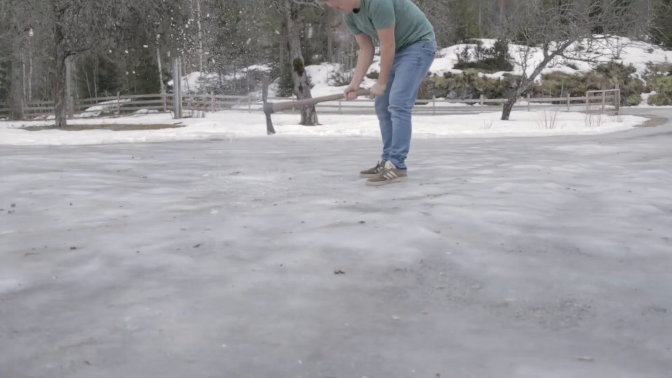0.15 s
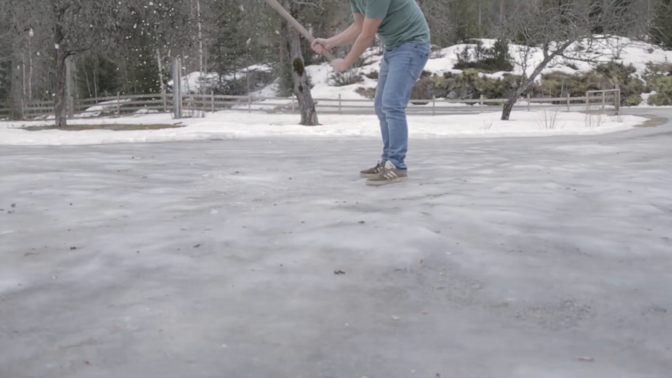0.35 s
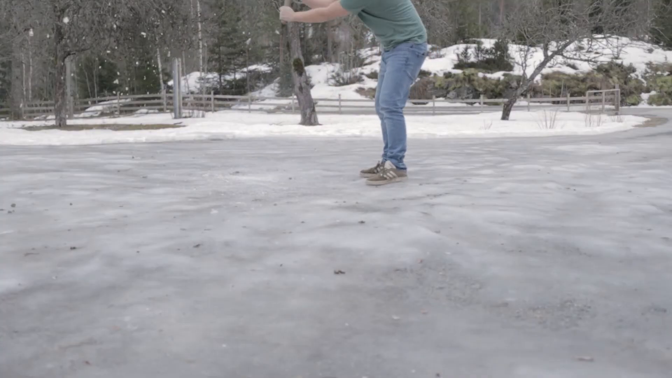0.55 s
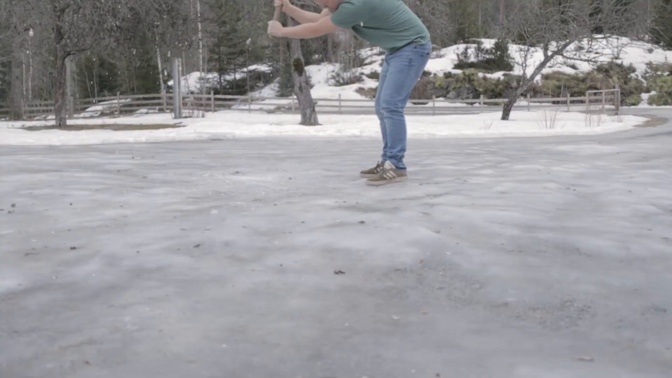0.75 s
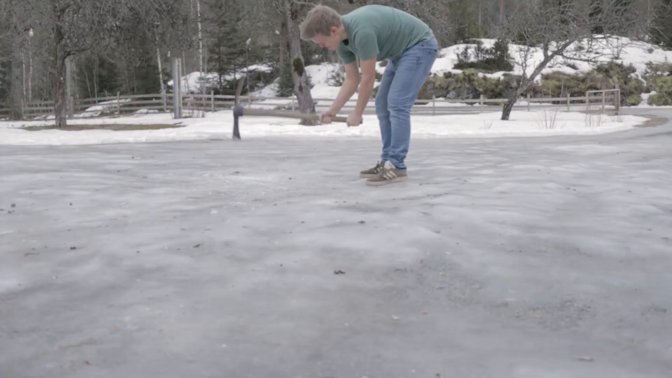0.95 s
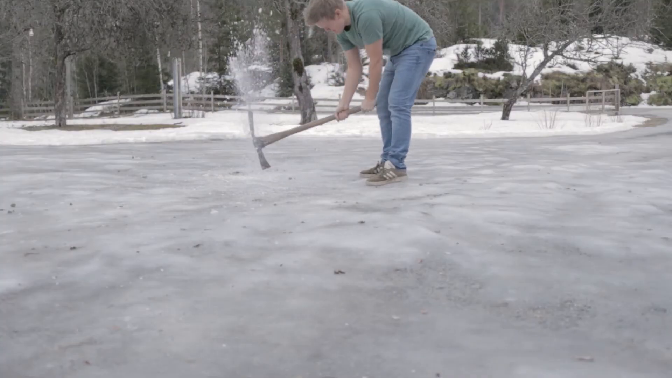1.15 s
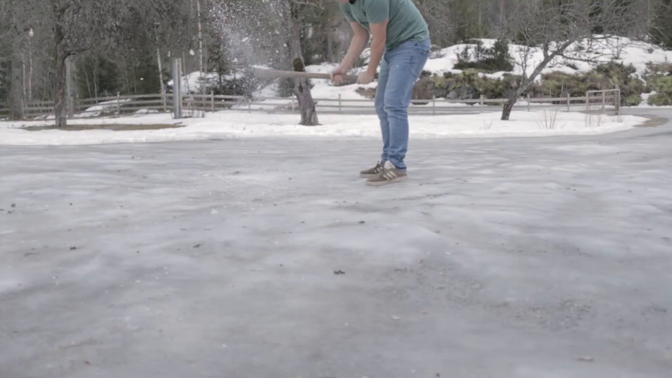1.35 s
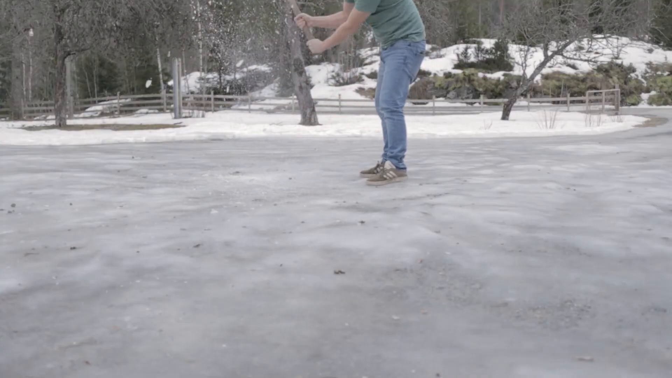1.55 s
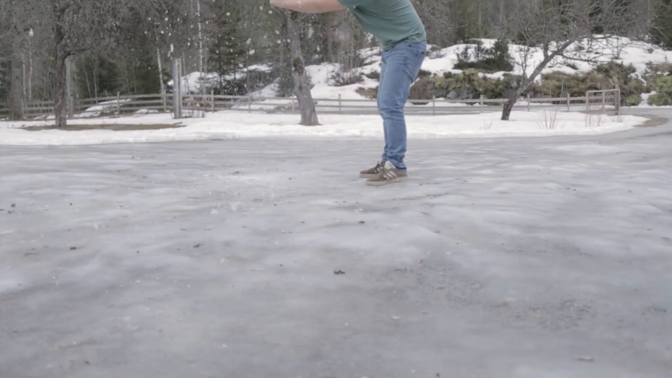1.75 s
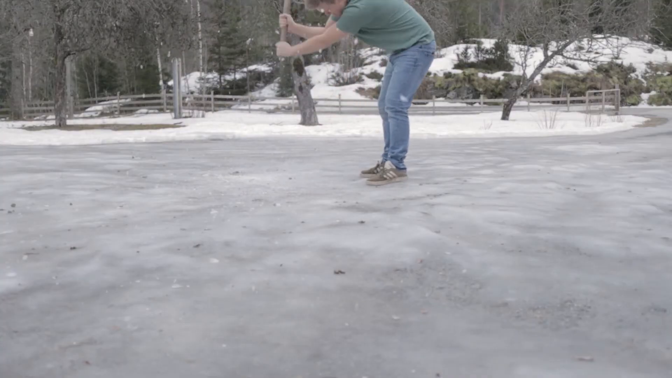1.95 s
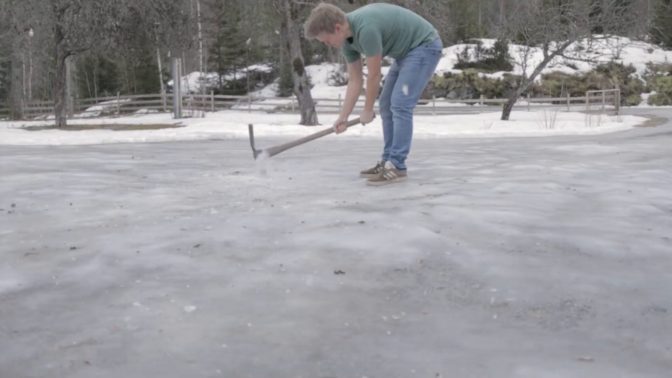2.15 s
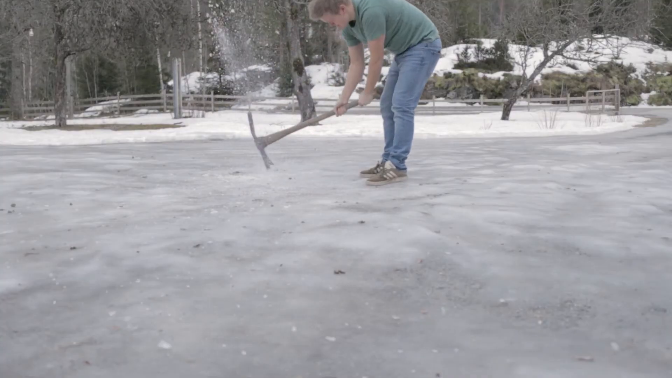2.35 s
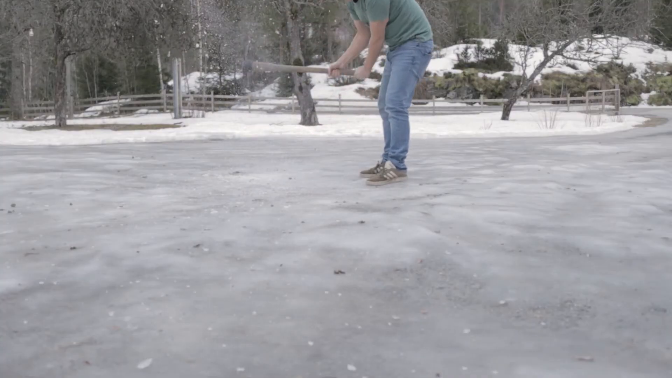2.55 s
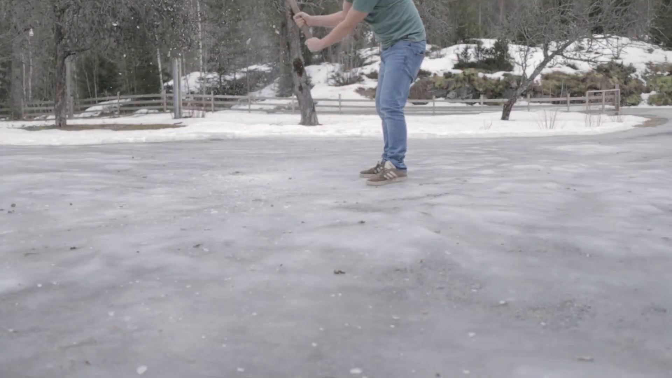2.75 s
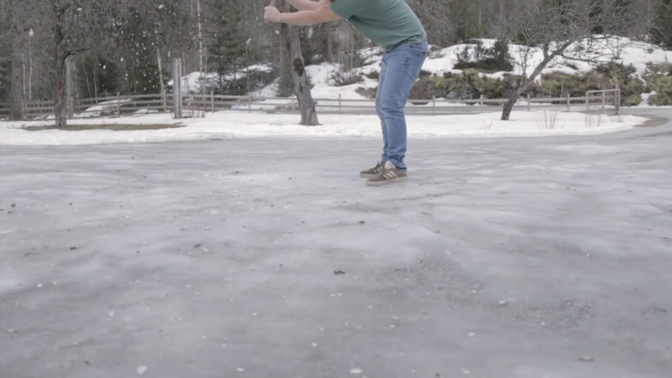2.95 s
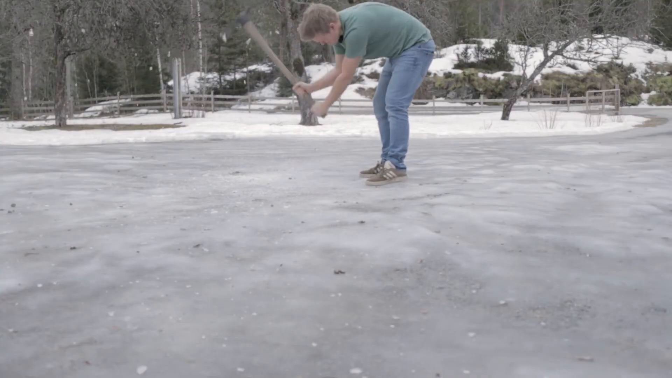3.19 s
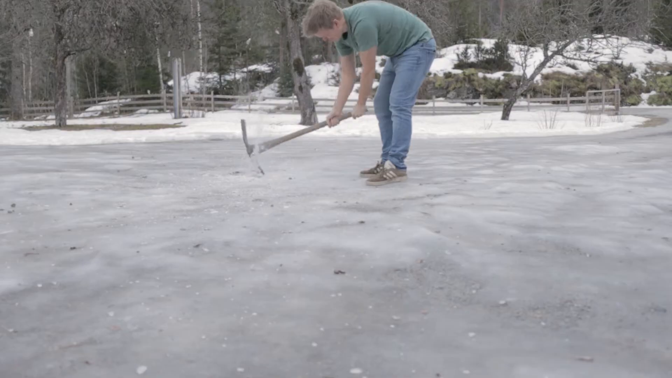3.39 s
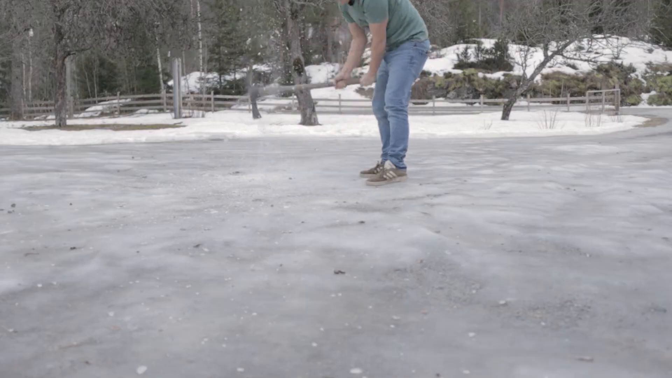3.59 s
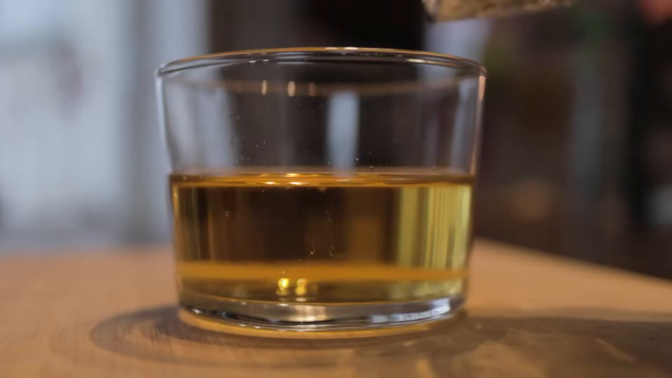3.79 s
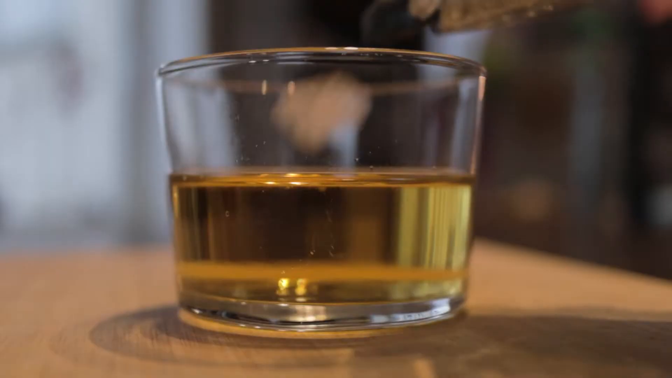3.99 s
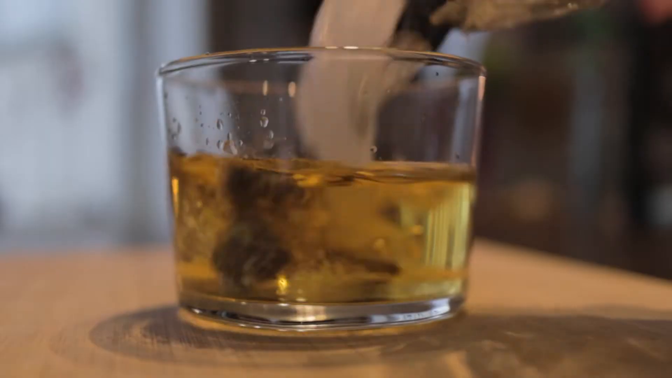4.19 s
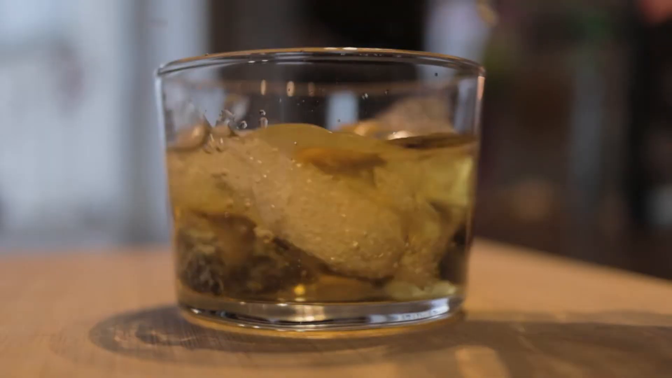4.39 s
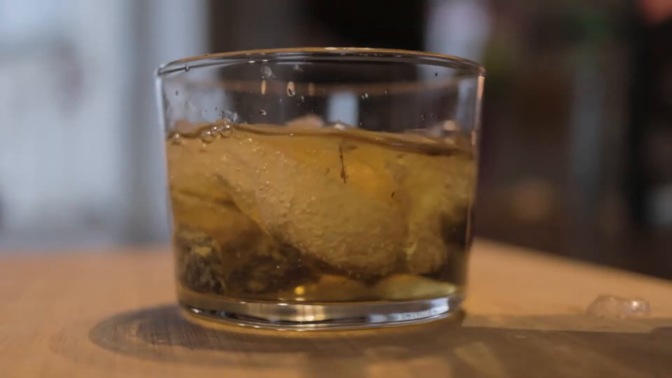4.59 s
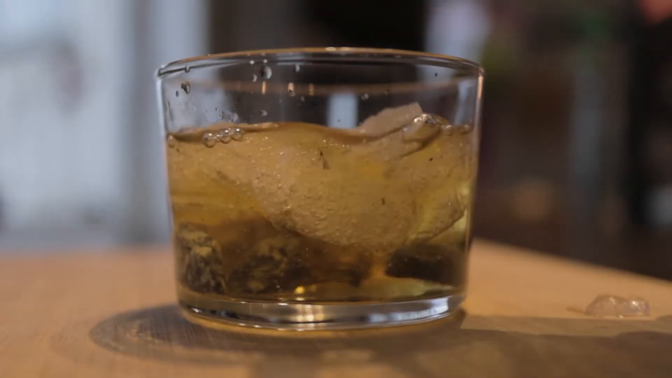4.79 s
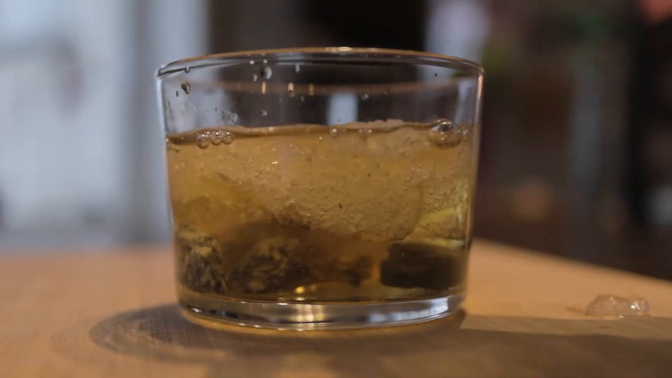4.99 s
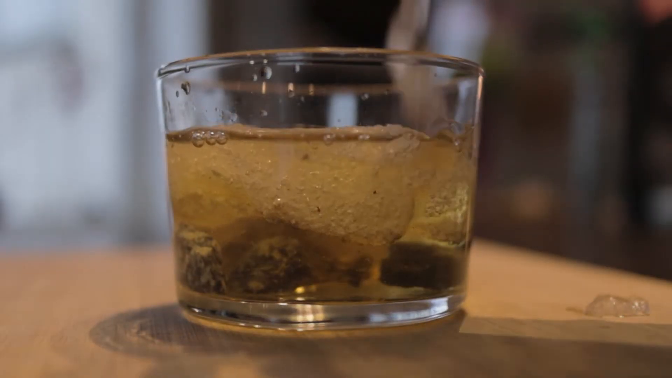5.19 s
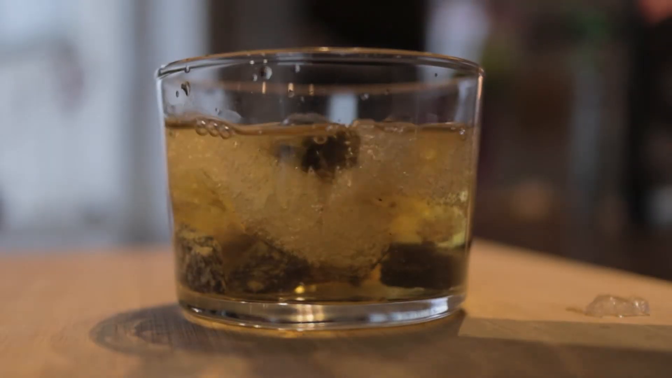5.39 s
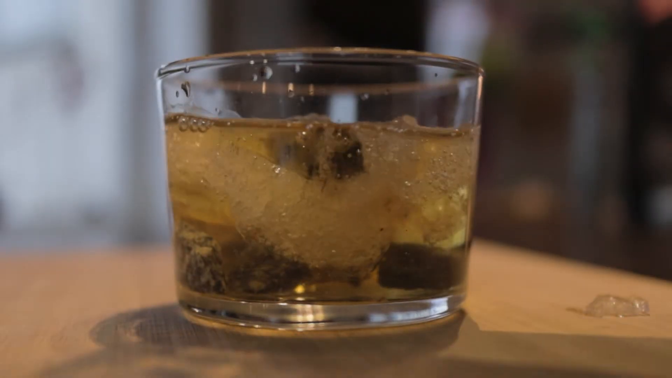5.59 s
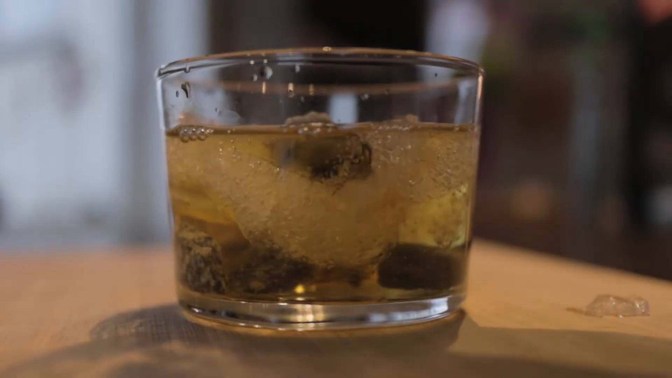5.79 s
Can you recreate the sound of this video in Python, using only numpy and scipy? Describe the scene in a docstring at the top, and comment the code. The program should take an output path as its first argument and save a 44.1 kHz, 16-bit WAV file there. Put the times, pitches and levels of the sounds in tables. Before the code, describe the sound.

In a quiet frozen yard, a pickaxe strikes ice about once a second: loud dry crack, short crunch, faint steel ring and a diffuse echo from the trees. Chips tick and patter close to the microphone. After the last blow the scene changes to a close, small room: ice scrapes and knocks down a tilted glass, plunges into a drink with clacks and plops, and settles with a faint fizz.

```python
"""In a frozen yard a pickaxe strikes four times, then in a small room ice drops from a tilted glass into a drink.
Outdoors, filtered noise bursts crack and crunch the ice, decaying sines ring the steel, a swelling diffuse
echo returns from the wood's edge, and short ticks and random grains are chips raining down nearby.
Indoors, knocks and stick-slip rubbing drive the glasses' modes, decaying sines are bubbles and resonant snaps
are ice clacking; the tumbler's modes sink as the drink rises round the ice, then partly recover."""
import sys
import numpy as np
from scipy import signal
from scipy.fft import rfft, irfft, next_fast_len
from scipy.io import wavfile

SR = 44100
rng = np.random.default_rng(int(sys.argv[2]) if len(sys.argv) > 2 else 0)


def generate_wav(sig):
    """Save sig (samples, or channels by samples) to the path in sys.argv[1] as 16-bit PCM at SR."""
    pcm = np.round(np.clip(np.atleast_2d(sig).T, -1, 1) * 32767).astype(np.int16)
    wavfile.write(sys.argv[1], SR, pcm)


N = 257226
T = np.arange(N) / SR
# the yard gives way to the room between these times
INDOORS_FROM_S, INDOORS_BY_S = 3.55, 3.95


def undb(db):
    """Decibel law: amplitude gain is 10 to the power of level over 20."""
    return 10 ** (np.asarray(db) / 20)


def unit(x):
    """Power normalization: scale to rms 1."""
    return x / np.sqrt(np.mean(x ** 2) + 1e-20)


def fade(t, t60):
    """Exponential decay: starts at t = 0 and falls 60 dB in t60 seconds."""
    return (t >= 0) * np.exp(-np.log(1000) * np.abs(t) / t60)


def add(track, s, sound):
    """Superposition: mix a sound in at time s, cut at the ends of the track."""
    i = int(s * SR)
    a, b = max(i, 0), min(i + len(sound), N)
    if b > a:
        track[a:b] += sound[a - i:b - i]


def colour(x, spectrum, tilt_db=0):
    """Minimum-phase filtering: causal, unit-power response through (Hz, dB) points, tilted in dB per octave."""
    n = 2 * next_fast_len(len(x) // 2 + 256)
    octave = np.log2(np.maximum(np.arange(n // 2 + 1) * SR / n, 1))
    hz, db = np.transpose(spectrum)
    # the tilt acts only above 600 Hz
    tilt = tilt_db * np.maximum(octave, np.log2(600))
    response = unit(undb(np.interp(octave, np.log2(hz), db) + tilt))
    # folding the cepstrum onto positive times makes the filter causal
    cepstrum = irfft(np.log(response))
    cepstrum[1:n // 2] *= 2
    cepstrum[n // 2 + 1:] = 0
    return irfft(rfft(x, n) * np.exp(rfft(cepstrum)))[:len(x)]


def resonate(x, hz, q):
    """Resonance: a single second-order peak of quality factor q."""
    return signal.lfilter(*signal.iirpeak(min(hz, .4 * SR), max(q, 1), fs=SR), x)


def high_pass(x, hz):
    """High-pass filter: a steep cut of the lows."""
    return signal.sosfilt(signal.butter(4, hz, "high", fs=SR, output="sos"), x)


def grains(rate, spread_db):
    """Shot noise: random clicks of unequal size, rate per second, rms 1."""
    size = undb(spread_db * np.minimum(rng.exponential(size=N), 4))
    sign = rng.choice([-1, 1], N)
    return unit((rng.random(N) < rate / SR) * size * sign)


def burst(t, t60):
    """Decaying noise impulse: the energy is the same for every draw."""
    envelope = fade(t, t60)
    return unit(rng.standard_normal(len(t)) * envelope) * np.sqrt(np.mean(envelope ** 2))


# spectra of the yard's murmur and the quiet room: frequency_hz, level_db
YARD_SPECTRUM = [(25, -20.5), (60, 0), (140, 3.5), (250, 2), (500, -4.5), (900, -5.5), (1500, -19),
                 (4000, -23), (16000, -31.5)]
ROOM_SPECTRUM = [(25, -0.5), (60, 5.5), (130, -2.5), (280, -0.5), (600, -7.5), (1500, -11.5), (5000, -18),
                 (16000, -22.5)]


def air():
    """Broadband ambience: a low outdoor murmur of wind gives way to a quiet room."""
    inside = np.interp(T, (INDOORS_FROM_S, INDOORS_BY_S), (0, 1))
    yard = undb(-56) * colour(rng.standard_normal(N), YARD_SPECTRUM)
    room = undb(-65.5) * colour(rng.standard_normal(N), ROOM_SPECTRUM)
    return (1 - inside) * yard + inside * room


# lumps plunging into the drink: start_s, churn_level_db, churn_t60_s
PLUNGES = [(4.172, -34, 1), (4.335, -27, 0.36), (4.454, -31.5, 0.11), (4.735, -41, 0.61),
           (5.354, -20.5, 0.15)]
# the drink heaves up quickly, then laps on faintly
HEAVE_S, LAP_DB, LAP_T60_S = .008, -64, 2.37


def churning():
    """Damped agitation: each plunge heaves the drink up, then the motion settles."""
    motion = np.zeros(N)
    for s, db, t60 in PLUNGES:
        heave = 1 - np.exp(-np.maximum(T - s, 0) / HEAVE_S)
        settling = undb(db) * fade(T - s, t60) + undb(LAP_DB) * fade(T - s, LAP_T60_S)
        motion += heave * settling
    return motion


def gliding_tone(hz, t60, rise):
    """Damped oscillation, as of a bubble: it rings and glides by rise octaves per second (up if positive)."""
    t = T[:int(min(t60, .3) * SR) + 2]
    phase = 2 * np.pi * np.cumsum(hz * 2 ** (rise * t)) / SR
    return np.sin(phase) * fade(t, t60) * (1 - np.exp(-t * hz))


def swarm(rate, low_hz, high_hz, cycles, rise, spread_db):
    """Bubble population: many of random pitch and size, each decaying 60 dB in a set number of cycles, rms 1."""
    out = np.zeros(N)
    for when, pitch, size in rng.random((int(rate * N / SR), 3)):
        hz = low_hz * (high_hz / low_hz) ** pitch
        gain = undb(-spread_db * np.log(size + 0.021))
        add(out, when * N / SR, gain * gliding_tone(hz, cycles / hz, rise))
    return unit(out)


# air pockets in the drink, and one high ringing knock of a lump (2077 Hz):
# start_s, pitch_hz, level_db, t60_s, rise_octaves_per_s
POCKETS_AND_KNOCK = [(4.232, 386, -21.5, 0.036, -19), (4.296, 311, -25, 0.086, 1.5),
                     (4.348, 601, -24.5, 0.087, 0), (4.356, 330, -12.5, 0.033, 14),
                     (4.382, 2077, -19.5, 0.083, 4.5), (4.463, 800, -18, 0.1, 14),
                     (4.976, 290, -42.5, 0.053, 5), (5.42, 330.4, -32.5, 0.17, 11),
                     (5.67, 230, -49.5, 0.3, 5)]
# the hollow behind each lump closes with a plop: level relative to the churn, glide in octaves per s
PLOP_HZ, PLOP_DB, PLOP_T60_S, PLOP_RISE = 350, 0.5, 0.062, -6.5


def plops_pockets_and_knock():
    """Damped resonance: a falling plop behind each lump, air pockets in the drink, and one high ringing knock."""
    out = np.zeros(N)
    for s, db, _ in PLUNGES:
        add(out, s + HEAVE_S, undb(db + PLOP_DB) * gliding_tone(PLOP_HZ, PLOP_T60_S, PLOP_RISE))
    for s, hz, db, t60, rise in POCKETS_AND_KNOCK:
        add(out, s, undb(db) * gliding_tone(hz, t60, rise))
    return out


# spectrum of sloshing drink: frequency_hz, level_db
SLOSH_SPECTRUM = [(150, -13), (240, -16), (310, 1), (430, -6), (620, 0), (1000, -14), (2200, -2.5),
                  (5000, -42.5), (16000, -61)]


def stirred_drink(churn):
    """Bubble entrainment: agitation drives water noise, gurgling and splashing, and a longer-lasting fizz."""
    water = undb(-8.0) * colour(grains(rate=930, spread_db=4.5), SLOSH_SPECTRUM)
    gurgle = undb(-8) * swarm(rate=220, low_hz=278.3, high_hz=693, cycles=28, rise=1.7, spread_db=4)
    splash = undb(-5.0) * swarm(rate=570, low_hz=774, high_hz=4780, cycles=20, rise=3.0, spread_db=7.0)
    # tiny bubbles and cracks in the wet ice go on ticking while the drink settles
    pings = swarm(rate=450, low_hz=2500, high_hz=12000, cycles=28, rise=0, spread_db=6.5)
    fizz = undb(-19.0) * churn ** 0.71 * pings
    return churn * (water + gurgle + splash) + fizz


# small clacks after each plunge: mean gap, first level, fall of level, middle pitch, decay
JOSTLE_GAP_S, JOSTLE_DB, JOSTLE_FALL_DB_PER_S = 0.041, -28.5, 37
JOSTLE_HZ, JOSTLE_T60_S = 3900, 0.012


def jostles(count):
    """Repeated collisions: floating lumps jostle after each plunge, unevenly spaced and ever more softly."""
    rows = []
    for s, *_ in PLUNGES:
        chance = rng.uniform(-1.3, 1, (count, 2))
        delays = JOSTLE_GAP_S * (1 + np.arange(count) + chance[:, 0] / 2)
        for delay, c in zip(delays, chance[:, 1]):
            level_db = JOSTLE_DB - JOSTLE_FALL_DB_PER_S * delay
            rows.append((s + delay, level_db, JOSTLE_HZ * 2 ** (c / 2), JOSTLE_T60_S))
    return rows


# ice clacking on ice and on the table: start_s, level_db, pitch_hz, t60_s
CLACKS = [(3.932, -12.5, 3360, 0.0079), (4.1766, -7.5, 6800, 0.011), (4.207, -16, 2920, 0.012),
          (4.382, -4.5, 4250, 0.0083), (4.446, -19, 3180, 0.031), (4.602, -20, 2700, 0.017),
          (4.6499, -20.5, 3180, 0.022), (4.7364, -15.5, 2960, 0.01), (4.7778, -28, 4700, 0.04),
          (4.804, -26.5, 3900, 0.019), (4.8451, -27, 3500, 0.018), (5.2938, -17.5, 5500, 0.014),
          (5.3004, -12, 5450, 0.033), (5.3256, -14.5, 3500, 0.037), (5.3554, -8.5, 5440, 0.011),
          (5.3661, -7.5, 3400, 0.012), (5.376, -16.5, 3600, 0.045), (5.6383, -43, 8840, 0.015)]
# spectrum of wet ice: frequency_hz, level_db
WET_ICE_SPECTRUM = [(300, -14.5), (1200, -3), (3500, -0.5), (5500, -0.5), (7000, -17.5), (11500, -4.5),
                    (16000, -27.5)]


def clacks():
    """Impact excitation: lumps meet with a dry snap, ring in a few uneven modes and thud through the table."""
    out, t = np.zeros(N), T[:SR // 8]
    for s, db, hz, t60 in CLACKS + jostles(count=4):
        snap = burst(t, t60)
        overtones = np.zeros(len(t))
        for mode_hz, size in zip(rng.uniform(1500, 12000, 5), rng.random(5)):
            overtones += size * np.sin(2 * np.pi * mode_hz * t)
        body = undb(7.5) * resonate(snap, hz, 6.3) + undb(-17) * colour(snap, WET_ICE_SPECTRUM)
        ring = undb(-19) * overtones * fade(t, 2.7 * t60)
        thud = undb(-26) * colour(burst(t, 0.027), SLOSH_SPECTRUM)
        add(out, s, undb(db) * (body + ring + thud))
    return out


# lumps sliding down the tilted glass: start_s, length_s, force_db
SLIDES = [(3.834, 0.12, -77.5), (3.969, 0.17, -55), (4.25, .43, -75.5), (5.08, 0.26, -75.5)]
# a slide builds up (60 dB in the rise time), holds and dies away
SLIDE_RISE_S, SLIDE_T60_S = 0.28, 0.16


def sliding():
    """Friction: the rubbing force of each lump on the tilted glass over time."""
    force = np.zeros(N)
    for s, length, db in SLIDES:
        build_up = fade(np.maximum(s - T, 0), SLIDE_RISE_S)
        release = fade(np.maximum(T - s - length, 0), SLIDE_T60_S)
        force += undb(db) * build_up * release
    return force


def rubbing_ice(slips):
    """Stick-slip radiation: the lump buzzes near the glass's lowest modes, hisses and murmurs."""
    buzz = undb(25) * resonate(resonate(slips, 2540, 10), 2540, 10)
    crackle = undb(8) * colour(slips, WET_ICE_SPECTRUM)
    # its wet skin hisses
    hiss = undb(20) * resonate(resonate(slips, 8000, 6), 8000, 6)
    # the rubbing also murmurs through the hand-held glass
    murmur = undb(20.5) * resonate(resonate(slips, 940, 3.4), 940, 3.4) + undb(1) * resonate(slips, 330, 1.5)
    return buzz + crackle + hiss + murmur


def glass(modes, knocks, rubbing, sag, reach):
    """Modal synthesis with mass loading: knocks and rubbing ring wall modes; liquid lowers the lowest most."""
    s, knock_db, knock_hz = np.transpose(knocks)
    first = int(INDOORS_FROM_S * SR)
    lowest_hz = modes[0][0]
    out = np.zeros(N)
    for hz, db, t60 in modes:
        moving_hz = hz * (1 - sag[first:] * lowest_hz / hz)
        turn = np.exp(2j * np.pi * np.cumsum(moving_hz) / SR)
        push = rubbing * lowest_hz / hz
        # a knock drives the modes near its favoured pitch; reach is in octaves
        push[(s * SR).astype(int)] += undb(knock_db) / (1 + (np.log2(hz / knock_hz) / reach) ** 2)
        # a decaying resonator in the frame that turns with the mode
        ring = signal.lfilter([1], [1, -fade(1 / SR, t60)], push[first:] / turn)
        out[first:] += undb(db) * (ring * turn).imag
    return out


# modes of the tilted glass: pitch_hz, level_db, t60_s
POURER_MODES = [(2492, 3.5, 0.065), (2610, -7, 0.04), (3035, -1, 0.03), (5236, 2.5, 0.055),
                (5970, -11, 0.035), (8610, -2, 0.05), (8800, -14, 0.029), (11100, -14, .03),
                (13000, -4, 0.08)]
# ice knocking on it: start_s, level_db, favoured_pitch_hz
POURER_KNOCKS = [(3.866, -34.5, 2500), (3.935, -10, 2700), (3.965, -18, 2710), (3.9891, -13.5, 8000),
                 (3.9916, -9.5, 6470), (4.064, -27, 5000), (4.1335, -14, 3980), (4.1537, -9.5, 6630),
                 (4.2078, -24.5, 4560), (4.24, -8.5, 6400), (4.4477, -27, 5100), (4.5336, -33.5, 2500),
                 (4.663, -31, 2780), (5.1397, -40, 6000), (5.1943, -32.5, 2420)]


def tilted_glass(slips):
    """Modal ringing: the tilted glass rings in its wall modes, with nothing heard from it below about 2.2 kHz."""
    return high_pass(glass(POURER_MODES, POURER_KNOCKS, slips, np.zeros(N), reach=0.3), 2230)


# modes of the filled tumbler: pitch_hz, level_db, t60_s
TUMBLER_MODES = [(1594, 1, 0.15), (3275, 1, 0.15), (5510, -3, 0.09), (8283, -3.5, 0.085),
                 (11330, -15, 0.07), (11740, -13, .06), (13450, -21, .08)]
# ice knocking on it: start_s, level_db, favoured_pitch_hz
TUMBLER_KNOCKS = [(4.176, -25, 9050), (4.2322, -13.5, 2500), (4.239, -12, 8600), (4.2458, -11, 6840),
                  (4.271, -18, 8000), (4.332, -18, 11300), (4.3382, -28.5, 1600), (4.353, -27, 6800),
                  (5.378, -40, 1400), (5.497, -42.5, 1360)]
# drink rising round the ice: time_s, fall_of_lowest_mode (fraction)
FILL = [(4.24, 0.0043), (4.34, 0.024), (4.41, 0.11), (4.5, 0.055)]


def tumbler(churn):
    """Liquid loading: knocks and the churning ring the walls, lowered in pitch by the drink."""
    rubbing = undb(-0.5) * churn ** 2 * grains(rate=270, spread_db=-7.0)
    sag = np.interp(T, *np.transpose(FILL))
    return high_pass(glass(TUMBLER_MODES, TUMBLER_KNOCKS, rubbing, sag, reach=0.77), 1360)


def table():
    """Forced vibration: the last lump lands hard enough to shake the table."""
    return undb(-42.5) * unit(resonate(rng.standard_normal(N), 110, 0.79)) * fade(T - 5.365, 0.34)


def drink():
    """Reverberation: ice judders down the glass, strikes the tumbler and churns the drink in a small room."""
    churn = churning()
    slips = sliding() * grains(rate=380, spread_db=3.5)
    direct = tilted_glass(slips) + tumbler(churn) + rubbing_ice(slips)
    direct = direct + stirred_drink(churn) + table() + clacks() + plops_pockets_and_knock()
    # the room answers 6 ms later with decaying noise
    tail = colour(burst(T[:SR // 2] - .006, 0.31), [(200, 3), (2000, -0.5), (5000, -5.5), (14000, -13.5)])
    return direct + undb(-14.5) * signal.fftconvolve(direct, tail / np.linalg.norm(tail))[:N]


# spectrum of a falling chip: frequency_hz, level_db
CHIP_SPECTRUM = [(150, -34), (700, -25), (1600, -5), (3400, 2), (5200, 4), (7500, -6), (12000, -4),
                 (16000, -7.5)]


def shower():
    """Dense shot noise: the last blow throws up a sheet of slush that patters down together."""
    patter = colour(grains(rate=2500, spread_db=2), CHIP_SPECTRUM, -7)
    return undb(-40) * patter * fade(np.abs(T - 3.6), .3)


# flight times of the two clouds of crumbs, and their spread
LOW_FLIGHT_S, HIGH_FLIGHT_S, FLIGHT_SPREAD_S = 0.39, .95, 0.2
# crumbs thicken just before a chip lands and thin out after; level relative to the chip
ESCORT_DB, ESCORT_RISE_S, ESCORT_T60_S = -37.5, 0.083, 0.13


def spray():
    """Ballistic flight: each blow throws a low and a high cloud of crumbs, and more fall round each chip."""
    gain = np.zeros(N)
    for s, *_, low_db, high_db in BLOWS:
        for flight_s, db in (LOW_FLIGHT_S, low_db), (HIGH_FLIGHT_S, high_db):
            gain += undb(db) * np.exp(-.5 * ((T - s - flight_s) / FLIGHT_SPREAD_S) ** 2)
    t = T[:SR // 2] - ESCORT_RISE_S
    escort = np.where(t < 0, fade(-t, ESCORT_RISE_S), fade(t, ESCORT_T60_S))
    for s, db, _ in CHIPS:
        add(gain, s - ESCORT_RISE_S, undb(db + ESCORT_DB) * escort)
    return gain * fade(np.maximum(T - INDOORS_FROM_S, 0), .4)


# the largest chips landing on the ice: start_s, level_db, brightness_db_per_octave
CHIPS = [(0.0812, -17.5, -0.5), (0.8585, -20, 7.5), (0.883, -11.5, -2), (0.9156, -13, -4),
         (1.5556, -24, 4.5), (1.6255, -5.5, 4.5), (1.7893, -17, -3), (1.797, -18, -3.5), (1.8756, -14, -4),
         (1.9057, -5, -2), (2.1245, -10.5, 16), (2.1597, -12, 1.5), (2.177, -17.5, 5), (2.1839, 1.5, 2.5),
         (2.8688, -6.5, -4.5), (3.0595, -17.5, -0.5), (3.289, -13, 0), (3.349, -18, 11.5),
         (3.5997, -20.5, -0.5), (3.627, -14.5, 17.5)]


def chips():
    """Impact noise: each chip ticks once and skitters on in crumbs; finer spray patters between them."""
    out, t = np.zeros(N), T[:SR // 10]
    for s, db, tilt_db in CHIPS:
        crumbs = rng.standard_normal(len(t)) * (rng.random(len(t)) < .03)
        # the crumbs fly for a moment before they land again
        skitter = crumbs * fade(t, 0.073) * (1 - np.exp(-t / 0.009))
        tick = burst(t, 0.0024) + undb(-4.0) * skitter
        add(out, s, undb(db) * colour(tick, CHIP_SPECTRUM, tilt_db))
    coarse = colour(grains(rate=90, spread_db=5.5), CHIP_SPECTRUM, 1.0)
    fine = colour(grains(rate=800, spread_db=1.5), CHIP_SPECTRUM, 1.9)
    return out + (undb(1.5) * coarse + undb(-6) * fine) * spray()


# the wood's edge answers this long after a blow
ECHO_DELAY_S = .085
# spectrum of the wood's echo: frequency_hz, level_db
ECHO_SPECTRUM = [(30, -15), (110, 1), (290, -6), (500, -11), (880, 0), (1500, -3.5), (2300, -5.5),
                 (3400, -10), (4300, -26.5), (5500, -23), (7000, -46), (16000, -47)]


def wood_echo(t):
    """Diffuse scattering: the echo swells up to the wood's edge, then dies away among scattered trunks."""
    late = t - ECHO_DELAY_S
    decay = fade(late, 0.24) + undb(-20.5) * fade(late, 1.0)
    swell = np.where(late < 0, fade(-late, 0.15), decay) * (t > 0)
    echo = colour(grains(rate=3000, spread_db=2)[:len(t)] * swell, ECHO_SPECTRUM)
    # the echo keeps two hollow tones
    return echo + resonate(echo, 870, 7.1) + resonate(echo, 1310, 20)


# modes of the steel head and haft: pitch_hz, level_db, t60_s
STEEL_MODES = [(905, 5, .25), (1313, 6, .6), (5464, -7, .3), (8000, -9, .35), (8726, 2, .43),
               (10920, -10, .33), (11620, -6, .2), (14690, -9, .35), (14830, -3, .2)]


def steel_ring(t, noise):
    """Modal vibration: the head and haft ring at once and again from the trees."""
    late = t - ECHO_DELAY_S
    ring = np.zeros(len(t))
    for hz, db, t60 in STEEL_MODES:
        envelope = 0.92 * fade(t, t60) + 0.24 * fade(late, t60)
        ring += undb(db) * np.sin(2 * np.pi * hz * t) * envelope
    # the trees scatter the head's low note back for a while
    scattered = unit(resonate(resonate(noise, 1320, 5), 1320, 5)) * fade(np.abs(late), .8) * (t > 0)
    return ring + undb(4) * scattered


# pick blows: start_s, crack_db, crunch_db, steel_ring_db, echo_db, crack_brightness_db_per_octave,
# low_crumbs_db, high_crumbs_db
BLOWS = [(-.05, -1, -7, -47.5, -26.5, 2.5, -60, -54), (1.0852, 1, -18, -42.5, -25.5, 0.5, -65, -49.5),
         (2.2449, -1, -12, -66, -28, 3, -54, -57), (3.385, 0.5, -16.5, -51, -25.5, 0.5, -56, -70)]
# spectra of splitting and crushed ice: frequency_hz, level_db
CRACK_SPECTRUM = [(30, -14), (90, -8.5), (170, -37), (400, -5), (900, 1.5), (1400, -1), (1900, -4.5),
                  (3000, -3.5), (4300, -13.5), (7000, -21), (12000, -25.5), (16000, -32)]
CRUNCH_SPECTRUM = [(30, -15.5), (90, 2), (180, -4.5), (300, 2.5), (550, -2.5), (1100, 3), (2200, -9.5),
                   (3500, -14.5), (5500, -24), (7500, -37), (16000, -53)]


def pickaxe():
    """Brittle fracture: the tip scuffs the crust, splits the ice and crushes on; steel and trees answer."""
    out, lead_s = np.zeros(N), .03
    t = T[:SR] - lead_s
    for s, crack_db, crunch_db, ring_db, echo_db, tilt_db, *_ in BLOWS:
        noise = rng.standard_normal((2, len(t)))
        # the scuff peaks 6 ms before the crack
        scuff = unit(resonate(resonate(noise[0], 3100, 2), 3100, 2)) * fade(np.abs(t + .006), .014)
        split = burst(t, 0.019) + undb(-12.0) * burst(t - .003, 0.0092)
        crack = colour(split, CRACK_SPECTRUM, tilt_db)
        fractures = grains(rate=4900, spread_db=5.5)[:len(t)]
        crushing = np.where(t < 0, fade(-t, 0.024), fade(t, 0.13))
        crunch = colour(fractures * crushing, CRUNCH_SPECTRUM, tilt_db)
        low_noise = colour(noise[1], [(40, -14.0), (130, 2.0), (290, -3.5), (450, -17.0), (2000, -38.5)])
        rumble = undb(-42) * low_noise * fade(t, 0.8)
        blow = undb(-24) * scuff + undb(crack_db) * crack + undb(crunch_db) * crunch + rumble
        answer = undb(ring_db) * steel_ring(t, noise[1]) + undb(echo_db) * wood_echo(t)
        add(out, s - lead_s, blow + answer)
    return out


def scene():
    """Superposition of sources: chopping outdoors, then the drink, over the air of each place."""
    return (air() + drink() + shower() + chips() + pickaxe())[None]


def record(dry):
    """Overload and band limiting: clipping at full scale, then a steep cut of the top."""
    top_hz = 16200
    low_pass = signal.ellip(8, .2, 70, top_hz, fs=SR, output="sos")
    return signal.sosfilt(low_pass, np.clip(dry, -1, 1))


dry = scene()
out = record(dry)
generate_wav(out)
```